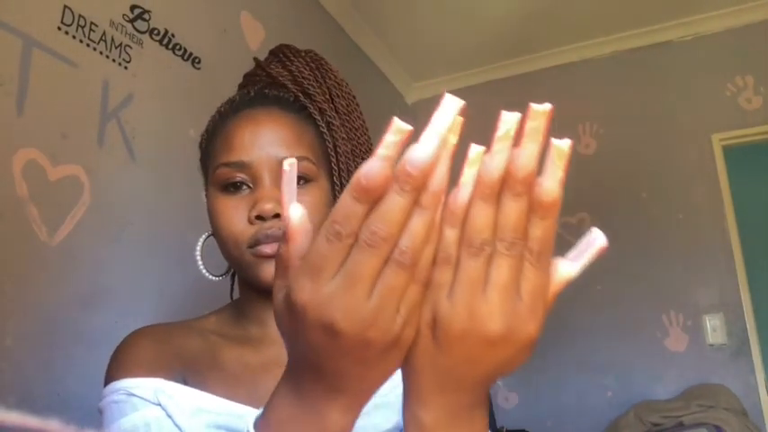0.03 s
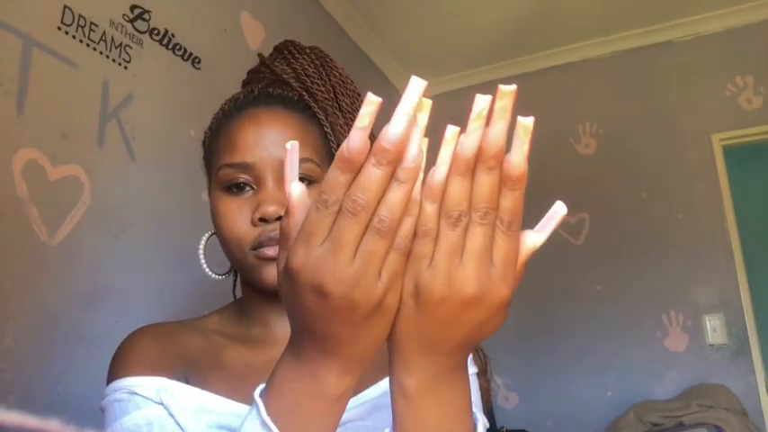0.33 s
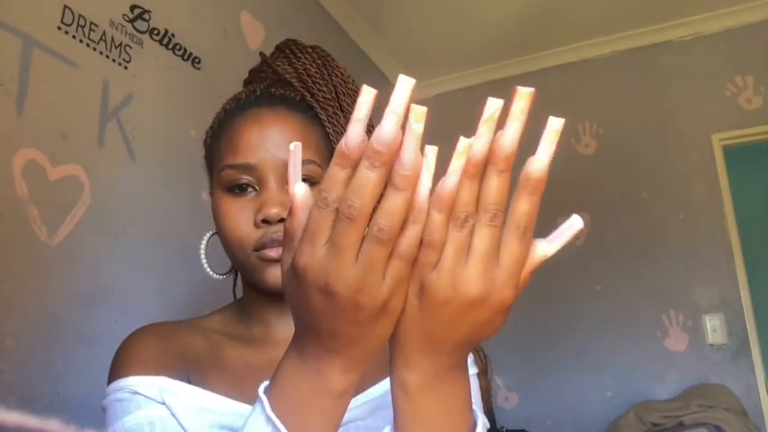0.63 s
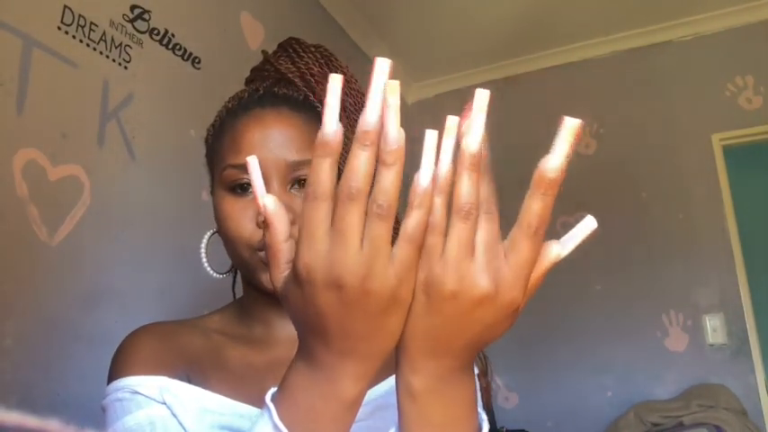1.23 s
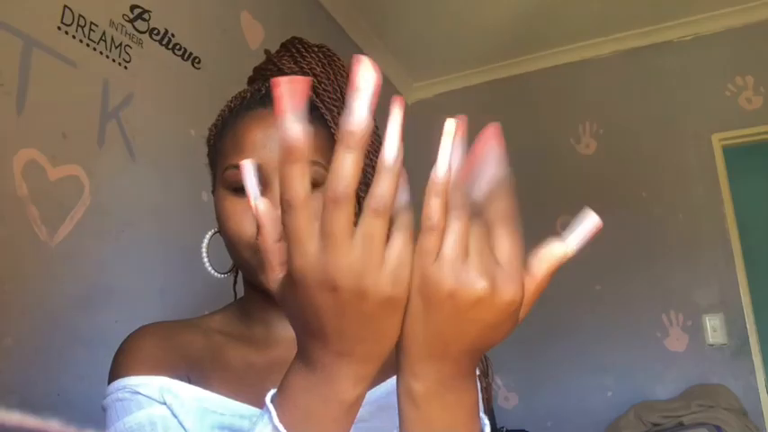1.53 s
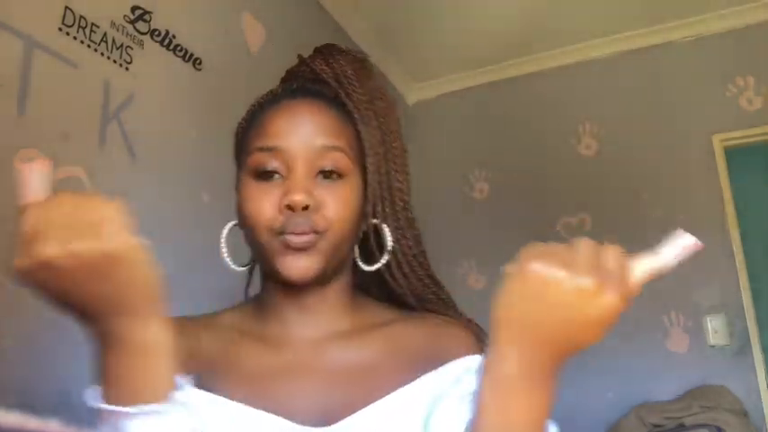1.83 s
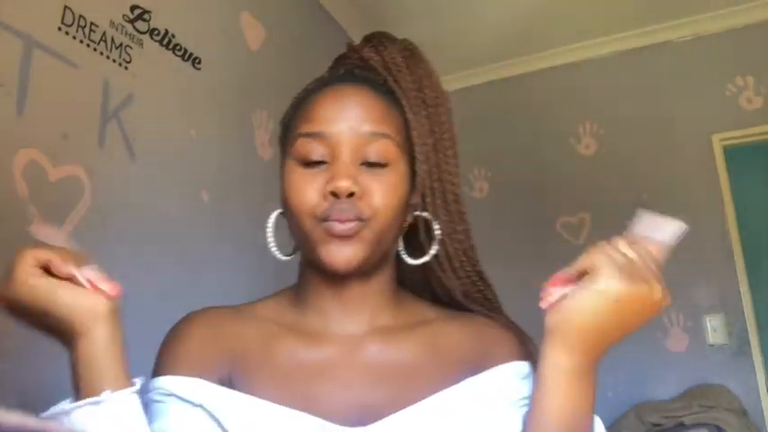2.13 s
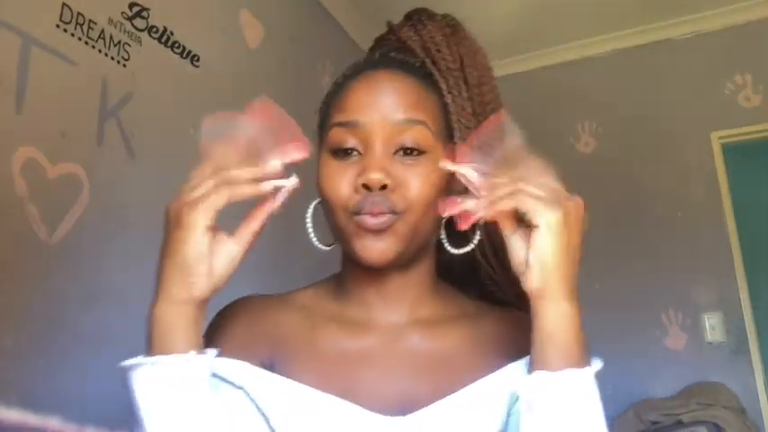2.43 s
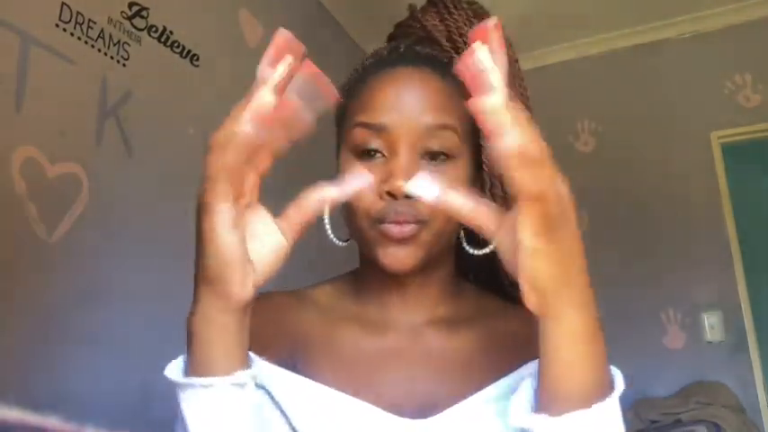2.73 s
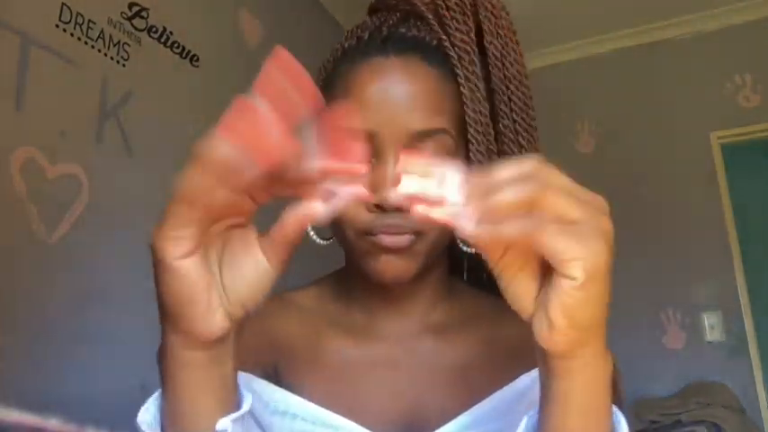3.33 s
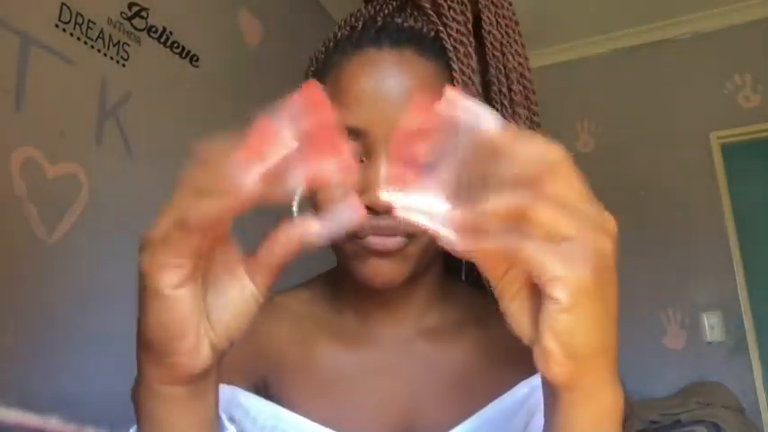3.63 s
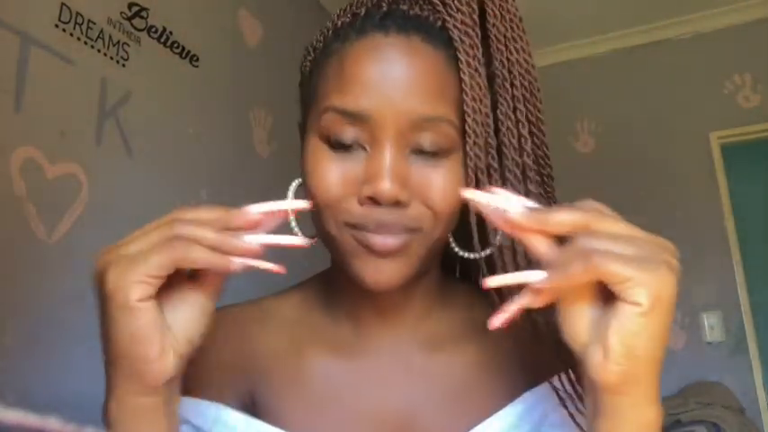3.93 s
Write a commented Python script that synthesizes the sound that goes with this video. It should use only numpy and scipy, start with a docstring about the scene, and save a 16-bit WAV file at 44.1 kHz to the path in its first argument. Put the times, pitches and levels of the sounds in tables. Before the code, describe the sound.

Long artificial nails tap together in quick flurries of sharp, dry clicks.

```python
"""In a small quiet room, long artificial nails tap against each other close to the microphone.
The hands rustle and part with a few light touches and a scrape, then flurries come about six times
a second as the fingers close. Each impact excites a nail's damped modes: a dry crack, followed by
a short reverberant tail. Beneath lie a low rumble, a faint hum, thin far whistles and a soft bump."""
import sys
import numpy as np
from scipy import signal
from scipy.fft import rfft, irfft
from scipy.io import wavfile

SR = 44100
rng = np.random.default_rng(int(sys.argv[2]) if len(sys.argv) > 2 else 0)


def unload_wav(signal):
    """Save mono or channel-first audio to the path in sys.argv[1] as 16-bit WAV at rate SR, clipped to [-1, 1]."""
    wavfile.write(
        sys.argv[1],
        SR,
        np.round(np.clip(np.atleast_2d(signal).T, -1, 1) * 32767).astype(np.int16),
    )


N = 176400

# Nail impacts. Each row: start in seconds, then clack, click, snap and sizzle levels in dB before trim.
TAPS = [(1.5734, -84, -64, -63.5, -77), (1.6999, -74, -43.5, -38.5, -51), (1.7037, -64, -66, -52, -59),
        (2.2278, -63, -49.5, -46, -49), (2.2573, -57, -40.5, -37, -34.5), (2.44, -53, -45, -53, -56),
        (2.4497, -55, -42, -40.5, -55), (2.4635, -36.5, -27.5, -24.5, -23.5), (2.478, -63, -38.5, -37, -40),
        (2.5105, -62, -45.5, -44.5, -43), (2.6038, -44.5, -36, -38, -44), (2.6422, -39, -27.5, -29, -29.5),
        (2.6497, -51, -39, -32, -39), (2.6602, -43, -34.5, -39, -37), (2.6692, -47.5, -33.5, -35.5, -47),
        (2.8055, -44, -35.5, -31, -32), (2.809, -51, -35.5, -38, -46), (2.812, -44, -44, -40, -27),
        (2.816, -36, -31.5, -33, -33), (2.8179, -40, -34, -26.5, -30), (2.8206, -43, -29.5, -28.5, -41),
        (2.8702, -52.5, -36.5, -41, -47), (2.9569, -43.5, -34.5, -37.5, -35), (2.9775, -55, -45, -52, -48),
        (2.9809, -42, -33, -38, -31), (2.9832, -48.5, -33, -36, -38), (3.0146, -58, -40, -38.5, -41),
        (3.029, -56, -44, -59, -58), (3.0374, -64, -47.5, -63, -68), (3.088, -47, -35.5, -41, -47),
        (3.1217, -32.5, -18.5, -20.5, -21), (3.1333, -40.5, -31, -19.5, -15.5),
        (3.1481, -37.5, -23.5, -20, -27), (3.1697, -66, -42, -42, -45), (3.1852, -54, -40, -50, -52),
        (3.201, -48, -29, -32.5, -36), (3.2891, -42.5, -33, -39.5, -37), (3.2993, -57, -41, -41, -46),
        (3.3116, -37.5, -28.5, -27.5, -21.5), (3.3217, -40.5, -30, -30, -32.5),
        (3.3389, -46, -39, -37.5, -36.5), (3.4726, -36, -19.5, -12.5, -28.5), (3.4906, -53, -44, -50, -43),
        (3.4956, -43.5, -32.5, -36, -37), (3.5047, -48, -37, -41, -37), (3.5264, -48, -35, -38, -35.5),
        (3.541, -58, -42, -47, -64), (3.5568, -52, -40.5, -43.5, -51), (3.6404, -35, -23, -26.5, -19.5),
        (3.6603, -44, -34, -33, -32), (3.6745, -40, -27.5, -36, -46), (3.6915, -59, -54, -55, -56.5),
        (3.7006, -43, -35, -39, -42.5), (3.703, -60, -34.5, -32.5, -40), (3.7099, -42.5, -27.5, -32, -42),
        (3.7331, -49.5, -39.5, -51, -53), (3.7375, -52, -44, -62, -68), (3.846, -37.5, -23.5, -25.5, -28.5),
        (3.8598, -39, -31, -24, -35.5), (3.8627, -45.5, -35, -28, -30), (3.88, -57, -43.5, -47, -50)]
# The registers clack, click, snap and sizzle. Each row: lower and upper edge in Hz.
REGISTERS_HZ = [(1250, 3200), (3800, 7500), (7500, 12500), (12500, 16500)]
# Trim of each register in dB.
REGISTER_TRIM_DB = [0.13, 0.37, 0.12, 1.2]
# Normal modes of a nail. Each row: frequency in Hz, relative level in dB, 60 dB decay time in seconds.
NAIL_MODES = [(1720, -9, .005), (2315, 8, 0.0068), (3085, -1, 0.0079), (4430, -1.5, .0035),
              (6150, 6, 0.0075), (9400, -9.5, .0025), (11800, 6, 0.003), (11860, 5, 0.004),
              (14600, 3.5, .002)]
# Reverberation. Each row: frequency in Hz, energy against direct sound in dB, 60 dB decay in seconds.
ROOM_TAIL = [(600, 1.5, 0.17), (1000, -1.5, 0.46), (1500, -7, 0.2), (2400, -8, 0.2), (4100, -11, 0.17),
             (6900, -8.5, 0.18), (10300, -10.5, 0.17), (15000, -11.5, .18)]
# Spectrum of the scrape. Each row: frequency in Hz, relative density in dB.
SLIDE_SPECTRUM = [(2000, -14), (3600, -12), (4600, -10), (6500, 3.5), (9500, -3), (12000, -13), (15500, -9)]
# Envelope of the rustle. Each row: time in seconds, level in dB.
RUSTLE_ENVELOPE = [(0, -90), (.17, -87), (.27, -76), (.38, -87), (1.35, -93), (1.47, -82), (1.62, -80.5),
                   (1.9, -73), (2.1, -79.5), (2.18, -70.5), (2.3, -71.5), (2.42, -69), (2.75, -74.5),
                   (3.3, -68), (4, -76.5)]
# Spectrum of the rustle. Each row: frequency in Hz, relative density in dB.
RUSTLE_SPECTRUM = [(1000, -6), (2800, -3), (4500, -8), (6300, -3), (9000, -12.5), (15000, -18)]
# Far whistles. Each row: start in seconds, length in seconds, pitch in Hz, level in dB before the swell.
WHISTLES = [(.2, 0.163, 3770, -80), (0.385, 0.22, 1092, -76.5), (.63, 0.35, 1284, -75),
            (1.02, 0.11, 1130, -77), (1.676, .19, 2160, -66.5), (1.92, 0.21, 705, -72.5),
            (2.131, 0.16, 664, -72.5), (3.22, .13, 1635, -67.5), (3.753, 0.17, 628, -72),
            (3.75, 0.122, 2450, -75.5)]
# Components of the hum. Each row: frequency in Hz, level in dB.
HUM_TONES = [(78, -70.5), (145, -73)]
# Spectrum of the rumble and hiss. Each row: frequency in Hz, relative density in dB.
FLOOR_SPECTRUM = [(20, -18), (33, -9), (50, 5), (72, 2), (105, -7), (180, -11), (400, -15), (800, -20),
                  (1500, -24.5), (3000, -30.5), (5000, -34.5), (6800, -35), (10300, -43), (12500, -39.5),
                  (15500, -40)]

PITCH_SPREAD, CRACK_DB = 0.088, 5   # fractional scatter of the modes; bare contact over the ringing
SCUFF_DB, SCUFF_T60_S = -22.5, 0.012
REBOUND_S, REBOUND_SPREAD, REBOUND_DB = .0012, .18, -7.5   # a weaker second contact
FINGER_HZ, FINGER_DB = (400, 1123), -18   # the fingertip's dull knock, against the clack


def tap(levels_db, filters, size=600):
    """Impact excitation: the force of contact, scuff and rebound drives a nail's damped modes."""
    t = np.arange(size) / SR
    force = from_db(SCUFF_DB - 60 * t / SCUFF_T60_S) * rng.standard_normal(size)
    force[0] += 1
    rebound_s = REBOUND_S * np.exp(REBOUND_SPREAD * rng.normal())
    force[int(np.clip(rebound_s * SR, 1, size - 1))] += from_db(REBOUND_DB + 2 * rng.normal())
    response = np.zeros(size)
    for hz, db, t60 in NAIL_MODES:
        pitch = hz * np.exp(PITCH_SPREAD * rng.normal())
        decay = from_db(db + 2 * rng.normal() - 60 * t / t60)
        response += decay * np.cos(2 * np.pi * pitch * t) / len(NAIL_MODES)
    response[0] += from_db(CRACK_DB)
    vibration = np.convolve(force, response)[:size]
    out = np.zeros(size)
    for sos, db in zip(filters, [levels_db[0] + FINGER_DB, *np.add(levels_db, REGISTER_TRIM_DB)]):
        part = signal.sosfilt(sos, vibration)
        out += from_db(db) * part / np.sqrt(np.sum(part ** 2) * 1000 / SR)   # level as energy over 1 ms
    return out


def nails():
    """Superposition: all the taps add, as radiated in one direction."""
    filters = [band_pass(3, edges) for edges in [FINGER_HZ, *REGISTERS_HZ]]
    out = np.zeros(N)
    for start, *levels_db in TAPS:
        add(out, start, tap(levels_db, filters))
    return out


def room(x, onset_s=0.00056, build_s=.002):
    """Reverberation: dense reflections build up quickly, then decay exponentially in each band."""
    t = np.arange(SR // 3) / SR
    build = 1 - np.exp(-np.maximum(t - onset_s, 0) / build_s)
    echoes = rng.standard_normal((2, len(t)))
    edges = np.geomspace(400, 18000, 12)
    response = 0
    for k, (low, high) in enumerate(zip(edges, edges[1:])):
        hz = np.sqrt(low * high)
        decay = from_db(-60 * t / at_hz(ROOM_TAIL, hz, column=2))
        tail = signal.sosfilt(band_pass(2, [low, high]), echoes[k % 2]) * build * decay
        tail *= np.sqrt(2 * (high - low) / SR / np.sum(tail ** 2))   # a unit impulse's energy in the band
        response = response + from_db(at_hz(ROOM_TAIL, hz)) * tail
    return signal.fftconvolve(x, response)[:N]


def reflections(walls=3):
    """Incoherent addition: the nails ring differently towards each wall, so their tail is smooth."""
    return sum(room(nails()) for _ in range(walls)) / np.sqrt(walls)


def slide(start_s=1.702, db=-50, t60_s=0.17):
    """Sliding friction: nail scrapes along nail as the hands part, in a dying burst of noise."""
    t = np.arange(N) / SR - start_s
    return (t > 0) * from_db(db - 60 * np.abs(t) / t60_s) * coloured_noise(SLIDE_SPECTRUM)


def rustle():
    """Friction noise: skin and sleeves brush softly as the hands move."""
    times, db = np.transpose(RUSTLE_ENVELOPE)
    return from_db(np.interp(np.arange(N) / SR, times, db)) * coloured_noise(RUSTLE_SPECTRUM)


def whistles(fall_share=.025, rise_share=0.25):
    """Narrow-band noise is heard as pitch: each far whistle swells, fades and sinks slightly."""
    out = np.zeros(N)
    for start, length, hz, db in WHISTLES:
        progress = np.linspace(0, 1, int(length * SR))
        swell = np.sqrt(2 * np.interp(progress, [0, rise_share, 1], [0, 1, 0]) * (1 - progress))
        pitch = hz * (1 + fall_share * (.5 - progress))
        add(out, start, from_db(db) * swell * wavering(pitch, width_hz=16))
    return out


def bump(start_s=2.56, length_s=.055, hz=429, db=-58.5):
    """A smooth envelope has no click: a brief low band of noise is heard as a soft bump."""
    out = np.zeros(N)
    swell = np.hanning(int(length_s * SR))
    add(out, start_s, from_db(db) * swell * wavering(np.full(len(swell), hz), width_hz=100))
    return out


def background(floor_db=-61.5):
    """Stationary noise: broadband rumble and hiss lie under a narrow-band, wavering hum."""
    floor = from_db(floor_db) * coloured_noise(FLOOR_SPECTRUM)
    hum = sum(from_db(db) * wavering(np.full(N, hz), width_hz=3.4) for hz, db in HUM_TONES)
    return floor + hum


def wavering(hz, width_hz):
    """Random modulation: a tone follows a pitch track while its level and phase wander; rms 1."""
    white = rng.standard_normal((2, len(hz) + SR // 2))
    low_pass = signal.butter(2, width_hz, fs=SR, output="sos")
    in_phase, quadrature = signal.sosfilt(low_pass, white)[:, SR // 2:]
    phase = 2 * np.pi * np.cumsum(hz) / SR
    return rms_one(in_phase * np.cos(phase) + quadrature * np.sin(phase))


def coloured_noise(spectrum):
    """Spectral shaping: white noise takes a given spectrum, rolled off below 20 Hz; rms 1."""
    hz = np.maximum(np.fft.rfftfreq(N, 1 / SR), 1)
    gain = from_db(at_hz(spectrum, hz)) * hz / np.hypot(hz, 20)
    return rms_one(irfft(rfft(rng.standard_normal(N)) * gain, N))


def from_db(db):
    """Decibels to amplitude ratio."""
    return 10 ** (np.asarray(db) / 20)


def rms_one(x):
    """Normalisation to an rms of 1."""
    return x / np.sqrt(np.mean(np.abs(x) ** 2) + 1e-20)


def at_hz(table, hz, column=1):
    """Interpolation of a table column on a log-frequency axis."""
    table = np.array(table)
    return np.interp(np.log(hz), np.log(table[:, 0]), table[:, column])


def band_pass(order, edges_hz):
    """A maximally flat band-pass filter."""
    return signal.butter(order, edges_hz, "band", fs=SR, output="sos")


def add(out, start_s, x):
    """Superposition of x on out from a given time."""
    i = int(np.clip(start_s * SR, 0, N - 1))
    out[i:i + len(x)] += x[:N - i]


def scene():
    """Sound pressures add: close nails, their reflections and the background, in one channel."""
    return (nails() + reflections() + slide() + rustle() + whistles() + bump() + background())[None]


def record(dry, cutoff_hz=15800):
    """Band limiting: a steep low-pass filter removes the highest treble."""
    return signal.sosfilt(signal.ellip(10, .2, 75, cutoff_hz, fs=SR, output="sos"), dry)


dry = scene()
out = record(dry)
unload_wav(out)
```